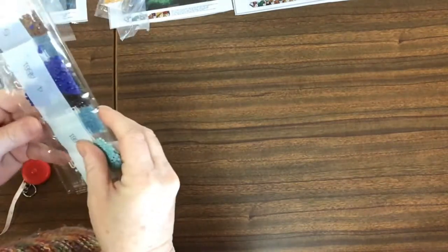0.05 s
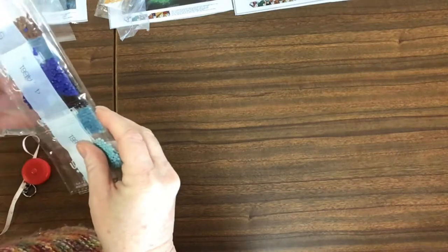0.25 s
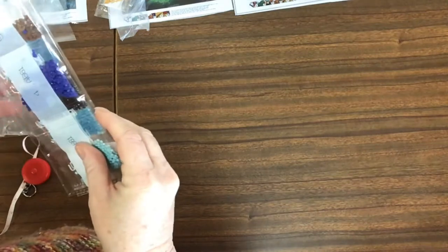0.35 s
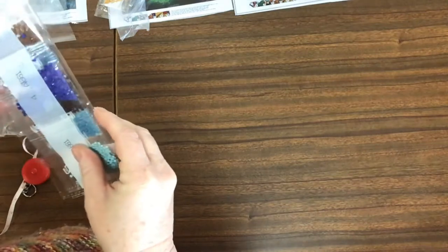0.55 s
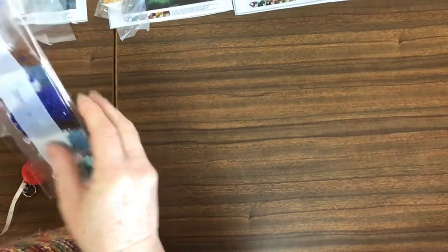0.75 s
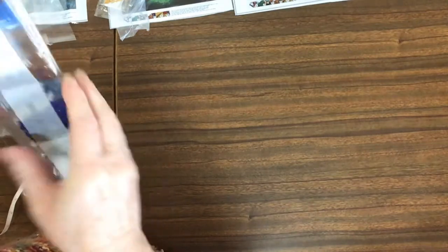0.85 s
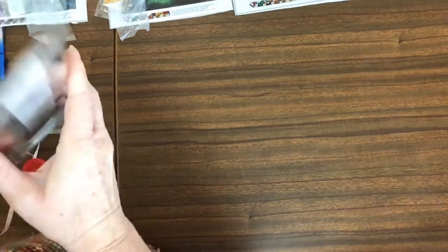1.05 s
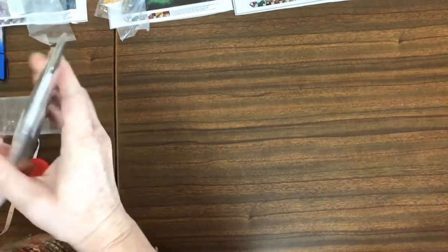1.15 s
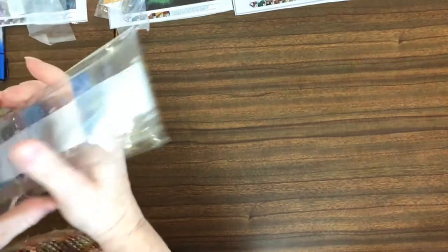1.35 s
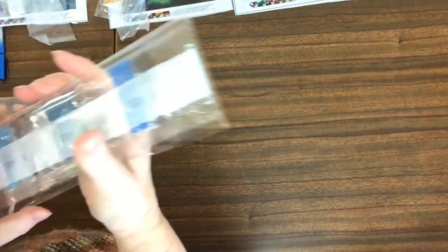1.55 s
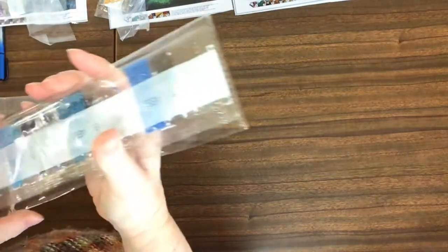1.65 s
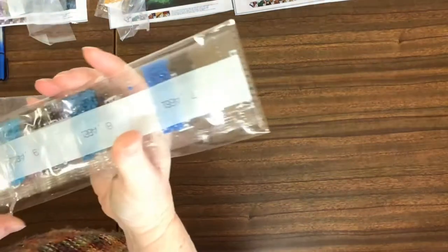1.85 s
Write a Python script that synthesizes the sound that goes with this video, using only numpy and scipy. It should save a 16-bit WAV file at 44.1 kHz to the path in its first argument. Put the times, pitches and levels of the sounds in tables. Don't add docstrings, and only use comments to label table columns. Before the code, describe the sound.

Stiff clear plastic sleeve crinkling and snapping sharply as hands turn it, close up, indoors

```python
import sys
import numpy as np
from scipy import signal
from scipy.fft import rfft, irfft
from scipy.io import wavfile

SR = 44100
rng = np.random.default_rng(int(sys.argv[2]) if len(sys.argv) > 2 else 0)


def attenuation_scalar(level_db):
    decades = np.asarray(level_db, float) / 20
    return 10 ** decades


def wav_record(signal):
    frames = np.transpose(np.atleast_2d(signal))
    bounded = np.clip(frames, -1, 1)
    quanta = np.round(bounded * 32767).astype(np.int16)
    wavfile.write(sys.argv[1], SR, quanta)


N = 83790


def decay(t, t60):
    return np.exp(-np.log(1000) * t / t60)


def band(x, lo_hz, hi_hz):
    return signal.sosfilt(signal.butter(2, [lo_hz, min(hi_hz, .45 * SR)], "band", fs=SR, output="sos"), x)


# frequency in Hz, level in dB per Hz.
ROOM_COLOUR = [
    (12, -34),
    (20, 5),
    (91, -2.5),
    (184, -12.5),
    (535, -16.5),
    (709, -14.5),
    (1020, -21),
    (10200, -35.5),
    (16500, -41),
]


def air():
    hz, db = np.array(ROOM_COLOUR).T
    f = np.fft.rfftfreq(N, 1 / SR) + 1
    colour = attenuation_scalar(np.interp(np.log(f), np.log(hz), db))
    x = irfft(rfft(rng.standard_normal(N)) * colour, N)

    knock_hz, knock_db, knock_t60_s = 710, -45, 0.72
    knock = band(rng.standard_normal(N), 0.23 * knock_hz, 1.76 * knock_hz)
    knock = attenuation_scalar(knock_db) * knock / knock.std() * decay(np.arange(N) / SR, knock_t60_s)

    surge_db, surges_per_s = -1, 9
    knots = np.arange(0, N + SR, SR / surges_per_s)
    swell = np.interp(np.arange(N), knots, rng.standard_normal(99)[:len(knots)])
    surge = attenuation_scalar(surge_db * swell) - 1
    x = x + surge * band(x, 17, 107)
    air_db = -51.5
    return attenuation_scalar(air_db) * x / x.std() + knock


# delay in seconds, level in dB.
EARLY_ECHOES = [(.0043, -15.5), (.0052, -21), (.0087, -19), (.0112, -31), (0.012, -40)]


def room(x):
    tail_db, t60_s, treble_t60_s, onset_s = -12.5, 0.37, 0.32, 0.0013
    t = np.arange(SR // 2) / SR
    noise = rng.standard_normal((2, len(t)))
    tail = band(noise[0], 350, 4600) * decay(t, t60_s)
    tail = tail + band(noise[1], 4700, 15000) * decay(t, treble_t60_s)
    tail = tail * (1 - np.exp(-(t / onset_s) ** 2))
    response = attenuation_scalar(tail_db) * tail / np.sqrt(np.sum(tail ** 2))
    for lag_s, db in EARLY_ECHOES:
        response[int(lag_s * SR)] += attenuation_scalar(db)
    return signal.fftconvolve(x, response)[:N]


def rings(modes, luck, size):
    pitch_spread, spread_db = .035, 2.2
    stutter_s, stutter_db = .0006, -9
    hz, db, t60 = np.array(modes).T
    m, t = len(modes), np.arange(size) / SR
    f = hz * (1 + pitch_spread * luck[:, :m])
    g = attenuation_scalar(db + spread_db * luck[:, 4:4 + m])

    def wave(u):
        u = u[:, None]
        tones = np.sin(2 * np.pi * f[..., None] * u) * decay(u, t60[:, None])
        return np.einsum("em,emt->et", g, tones)

    late = np.maximum(t - stutter_s * np.exp(0.321 * luck[:, 8:9]), 0)
    second = attenuation_scalar(stutter_db + 2.0 * luck[:, 9:10]) * np.sign(luck[:, 10:11])
    y = wave(t + 0 * late) + second * wave(late)
    return y / np.abs(y).max(axis=1, keepdims=True)


def place(times, db, shapes):
    size = shapes.shape[1]
    out = np.zeros(N + size)
    at = np.clip((times * SR).astype(int), 0, N - 1)[:, None] + np.arange(size)
    np.add.at(out, at, attenuation_scalar(db)[:, None] * shapes)
    return out[:N]


# frequency in Hz, level in dB, time to fall 60 dB in seconds.
BRIGHT_RING = [(8517, 11.5, 0.0021), (7430, 4, 0.0021), (9950, -4.5, 0.0056), (5970, -8.5, 0.006)]
PANEL_RING = [(2144, 27, 0.0041), (1670, -26, .0025), (3380, -1, 0.0087)]
EDGE_RING = [(12270, -4, 0.0014), (14000, -19, 0.0035)]
# lowest Hz, highest Hz, extra level in dB that reaches the walls.
PART_BANDS = [
    (5790, 10370, -5.5),
    (1204, 4620, 8),
    (11300, 15000, 0.5),
]


def radiate(times, dbs, luck, size):
    aimed = 0.033
    direct, around = 0, 0
    parts = zip((BRIGHT_RING, PANEL_RING, EDGE_RING), PART_BANDS)
    for k, (modes, (lo_hz, hi_hz, wall_db)) in enumerate(parts):
        wide_lo, wide_hi = .84 * lo_hz, 1.12 * hi_hz
        ringing = place(times, dbs[k], rings(modes, luck[:, k], size))
        direct = direct + band(ringing, wide_lo, wide_hi)

        click = np.sign(luck[:, k, :1]) * np.sqrt(SR / (hi_hz - lo_hz))
        click_db = dbs[k] + wall_db - aimed * (dbs[0] + 23.5)
        clicks = band(place(times, click_db, click), lo_hz, hi_hz)
        around = around + band(clicks, wide_lo, wide_hi)
    return np.array([direct, around])


# start in seconds, peak level in dB.
CONTENT_THUMPS = [(.1834, -39.5), (.2457, -35.5), (.3431, -42.5), (.699, -35.5), (.7153, -33),
                  (.7564, -35.5), (.7725, -68), (.985, -48), (1.0273, -37), (1.1096, -32.5),
                  (1.1436, -28.5), (1.3278, -62), (1.4596, -41.5), (1.6008, -38.5)]
# frequency in Hz, level in dB, time to fall 60 dB in seconds.
THUMP_RING = [(633, 6, 0.015), (398, -5, 0.024), (800, -10, .01)]


def thumps():
    times, db = np.array(CONTENT_THUMPS).T
    knocks = rings(THUMP_RING, rng.standard_normal((len(times), 11)), size=900)
    return band(place(times, db, knocks), 223, 1450)


# time in seconds, level of the fine crackle in dB.
HANDLING_EFFORT = [(0, -46), (.2, -60), (.26, -49), (.42, -56.5), (.64, -46), (.68, -42), (.8, -48),
                   (.87, -65), (.9, -40), (1.0, -51.5), (1.1, -46.5), (1.12, -37.5), (1.17, -34),
                   (1.21, -48), (1.28, -39), (1.4, -50.5), (1.56, -49), (1.9, -62.5)]


def crackle():
    count, creases_per_s, scatter_db = 10000, 3200, 4.5
    fine_db, panel_db, edge_db, body_db = -5, -14, -8.5, -4
    when = rng.random(count)
    scatter = scatter_db * np.minimum(rng.exponential(size=(3, count)), 4)
    luck = rng.standard_normal((count, 3, 11))
    times = np.cumsum(-np.log(when)) / creases_per_s
    effort_db = np.interp(times, *np.array(HANDLING_EFFORT).T)
    db = np.where(times < N / SR, effort_db + fine_db, -200)

    rubs = place(times, db + body_db + 2 * scatter[1], np.sign(luck[:, 0, :1]))
    body = band(rubs, 330, 860)
    parts_db = np.array([[0], [panel_db], [edge_db]])
    return body + radiate(times, db + parts_db + scatter, 2.5 * luck, size=64)


# start in seconds, then peak levels
# in dB of the bright ring, the panel knock and the sharp edge.
CREASE_SNAPS = [(0.0023, -41, -40, -42), (0.0267, -23.5, -26, -54), (0.0674, -25, -36.5, -45),
                (0.1018, -26.5, -25.5, -50), (0.115, -53, -48, -63), (0.1302, -42, -44, -54),
                (0.138, -45, -31.5, -57), (0.1506, -22, -27, -33), (0.1837, -24, -34.5, -48),
                (0.207, -30, -38, -52), (0.2268, -17, -27, -22), (0.2305, -35, -49, -40),
                (0.234, -33, -53, -41), (0.2457, -11, -24, -20), (0.2553, -19, -50, -27),
                (0.279, -35, -36.5, -52), (0.3241, -49, -31, -55), (0.3431, -13.5, -31, -49),
                (0.3944, -34, -38, -47), (0.4182, -62, -58, -59), (0.4253, -31.5, -42, -55),
                (0.4417, -8.5, -24, -16), (0.457, -18, -43, -21), (0.5286, -61, -57, -57),
                (0.5389, -5.5, -34, -18), (0.5468, -21.5, -27, -35), (0.6002, -23, -33, -48),
                (0.604, -30.5, -40, -33), (.0535, -34, -38, -55),
                (0.6085, -23, -39, -44), (0.629, -35, -27.5, -54), (0.6351, -32, -48, -52),
              (0.645, -43, -27.5, -50), (0.6561, -21, -47, -47), (0.6617, -10, -43, -58),
              (0.6647, -30, -23, -34), (0.699, -14, -28, -18.5), (0.7046, -22.5, -32.5, -38),
              (0.7148, -24, -30.5, -25), (0.7442, -35, -42, -45), (0.7559, -16.5, -23.5, -38),
              (0.7605, -30, -49, -44), (0.7646, -30, -51, -27), (0.7731, -20, -28.5, -45),
              (0.803, -22.5, -37.5, -43), (0.8402, -21.5, -25, -50), (0.8832, -17.5, -31, -14.5),
              (0.9041, -22.5, -31.5, -47), (0.9315, -40, -62, -45), (0.9541, -19, -38, -36),
              (0.9571, -36, -56, -45), (1.0155, -16.5, -30, -49), (1.02, -42, -33, -43),
              (1.0243, -20, -59, -22), (1.0272, -17.5, -27, -48), (1.039, -27, -33, -61),
              (1.047, -33, -44, -40), (.985, -51, -41.5, -55),
                (1.056, -36, -42, -45), (1.089, -46, -53, -56), (1.096, -31, -32.5, -49),
              (1.1096, -7.5, -23.5, -43), (1.1421, -14, -24, -21), (1.1619, -15.5, -28, -21.5),
              (1.1651, -35, -31.5, -41), (1.1787, -20.5, -29.5, -43), (1.19, -51, -32, -49),
              (1.2092, -66, -30, -34), (1.2218, -14, -26.5, -37), (1.225, -22, -33, -46),
              (1.232, -21, -37, -21), (1.24, -36, -26.5, -25), (1.254, -31, -36, -47),
              (1.2615, -29, -23, -36), (1.265, -16, -21.5, -20), (1.2818, -8.5, -25, -8),
              (1.328, -10.5, -12.5, -16), (1.3371, -4, -18.5, -41), (1.3552, -37, -40, -39),
              (1.3682, -12, -24, -13.5), (1.418, -3, -23.5, -34), (1.4305, -25, -23.5, -50),
              (1.4597, -2.5, -23, -8.5), (1.6005, 2, -14, -10.5), (1.6346, -35, -53, -47),
              (1.8255, -19, -33.5, -27), (1.1072, -22, -22, -34), (1.1436, -15.5, -22, -38)]


def snaps():
    rows = np.array(CREASE_SNAPS)
    luck = rng.standard_normal((len(rows), 3, 11))
    return radiate(rows[:, 0], rows[:, 1:].T, luck, size=256)


def scene():
    direct, around = snaps() + thumps() + crackle()
    return (direct + room(around) + air())[None]


def top_cut(x):
    return signal.sosfilt(signal.butter(12, 16990, fs=SR, output="sos"), x)


def record(dry):
    port_hz, port_width_hz, port_db = 9060, 4000, -2.5
    port = signal.lfilter(*signal.iirpeak(port_hz, port_hz / port_width_hz, fs=SR), dry)
    x = dry + attenuation_scalar(port_db) * port
    ceiling = 1.5
    x = ceiling * np.tanh(x / ceiling)
    x = signal.sosfilt(signal.ellip(6, .5, 22, 15750, fs=SR, output="sos"), x)
    x = signal.sosfilt(signal.ellip(10, .2, 80, 16850, fs=SR, output="sos"), x)
    return top_cut(x)


dry = scene()
out = record(dry)
wav_record(out)
```